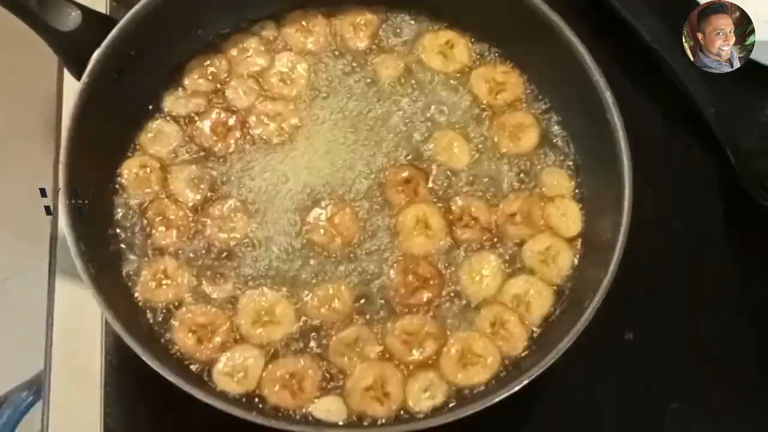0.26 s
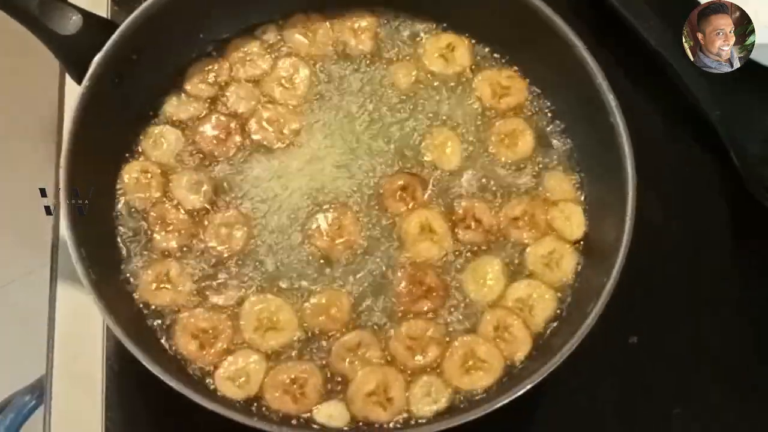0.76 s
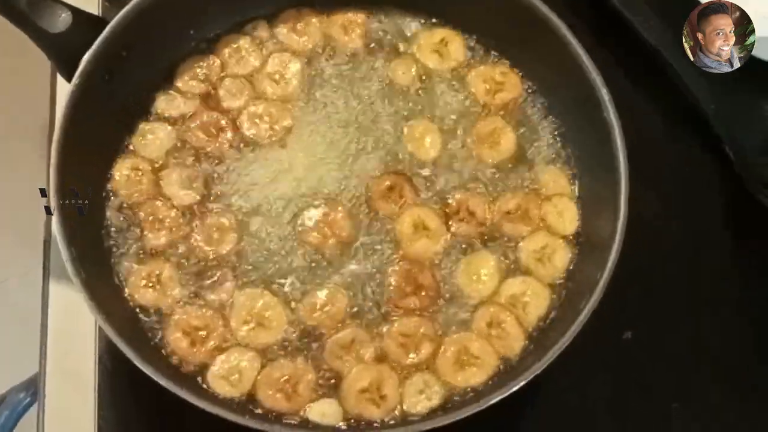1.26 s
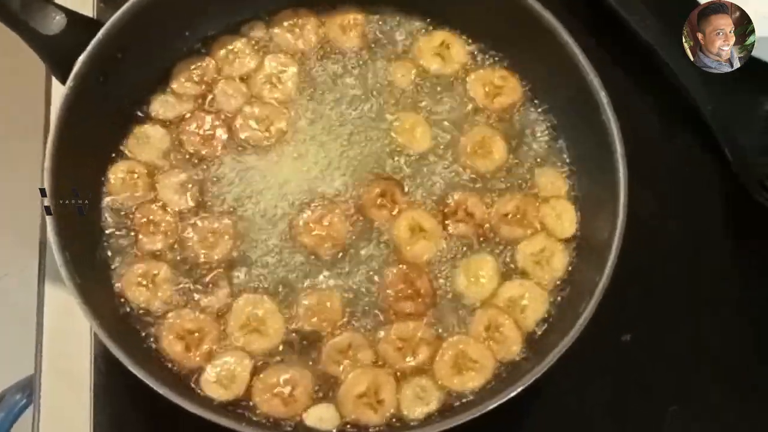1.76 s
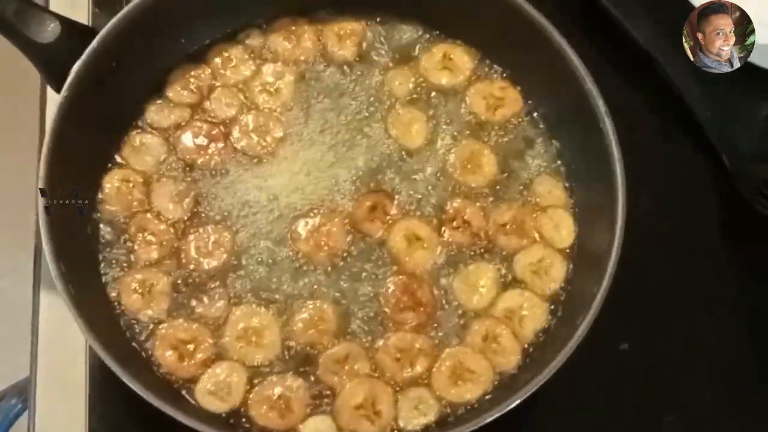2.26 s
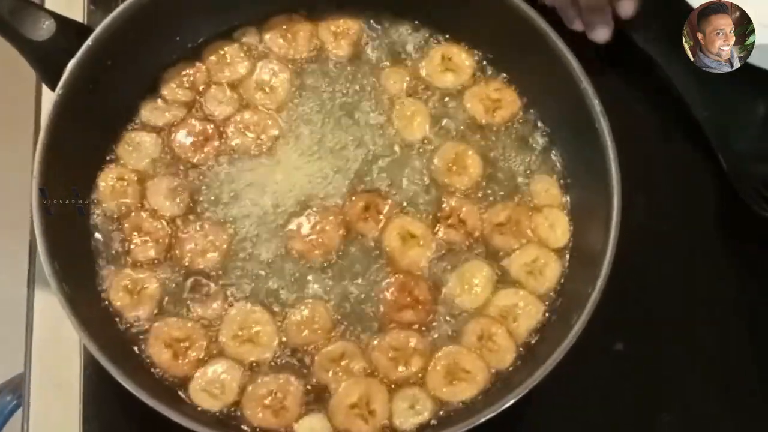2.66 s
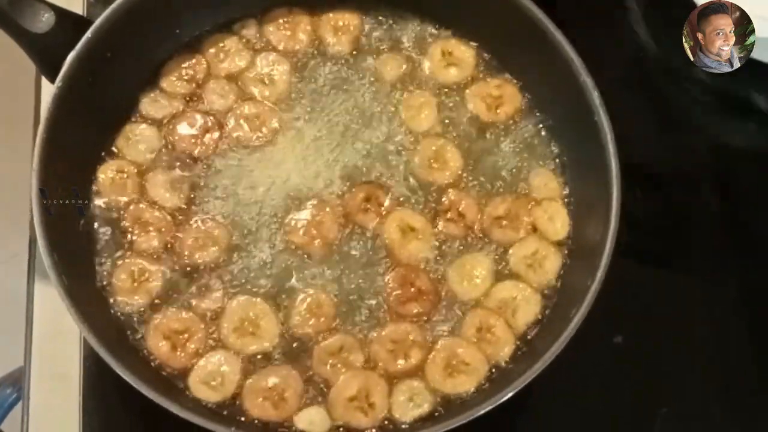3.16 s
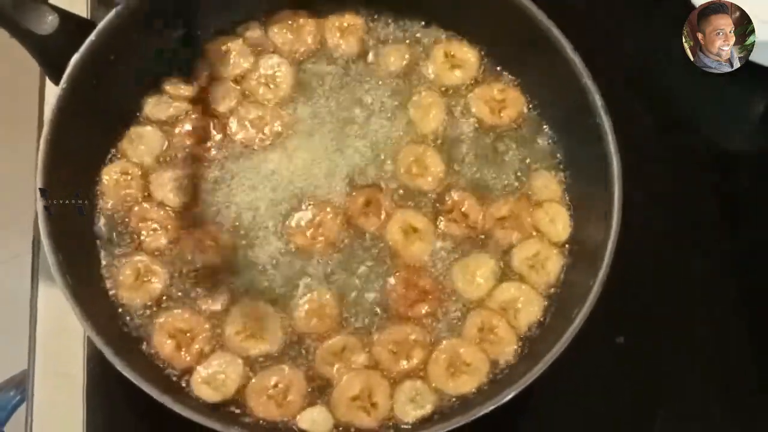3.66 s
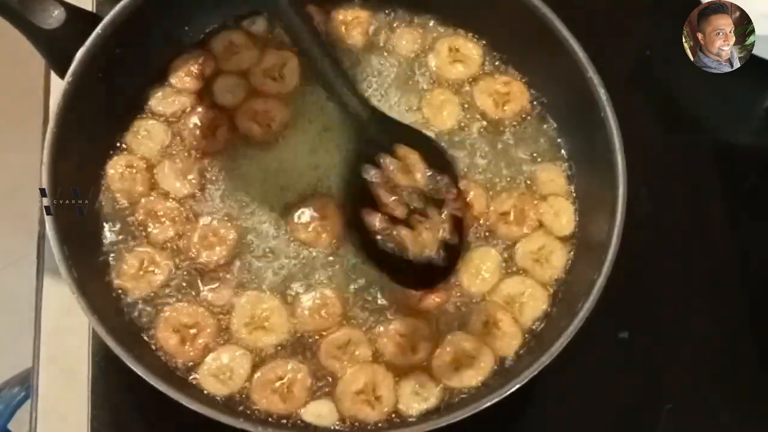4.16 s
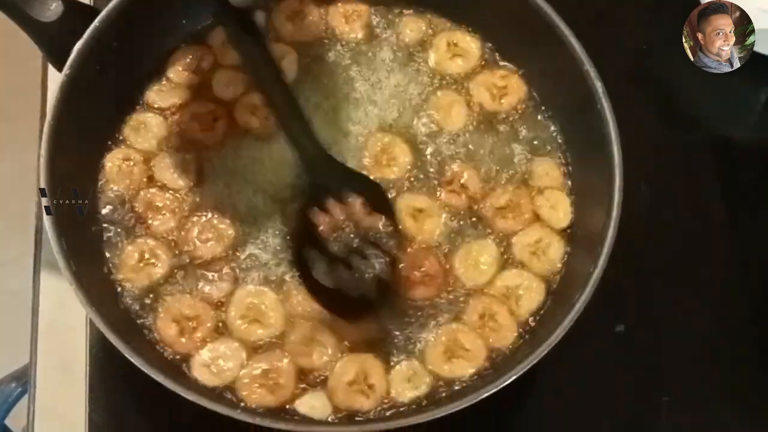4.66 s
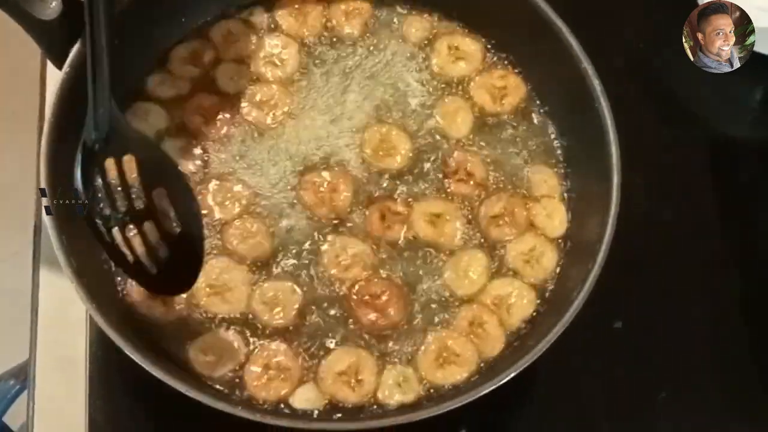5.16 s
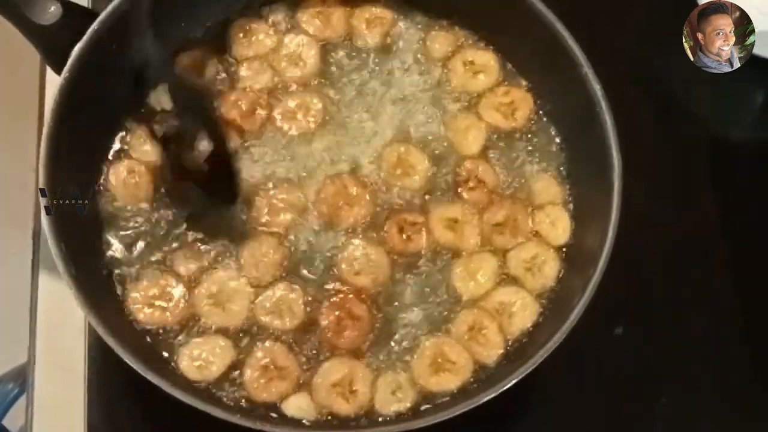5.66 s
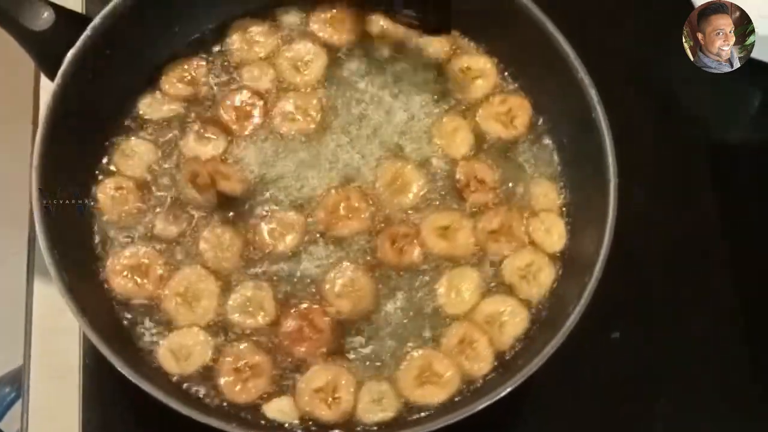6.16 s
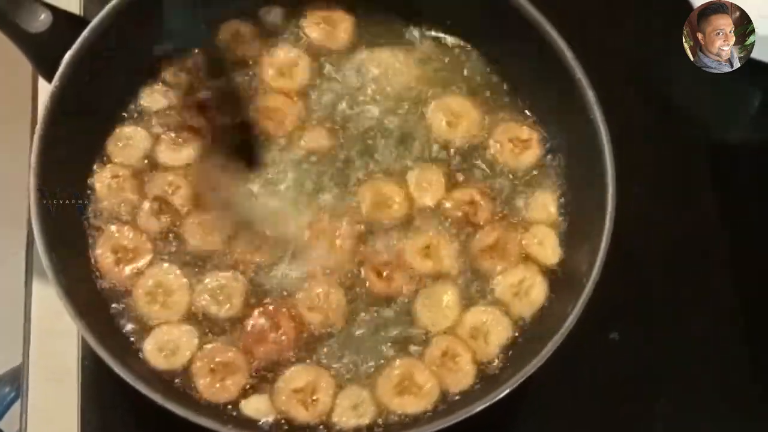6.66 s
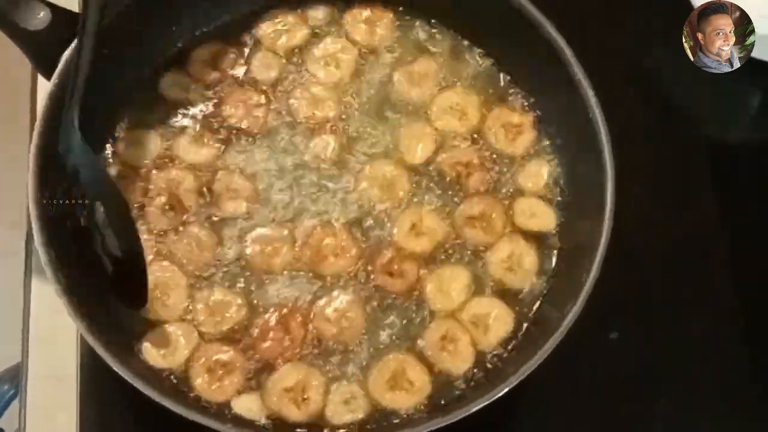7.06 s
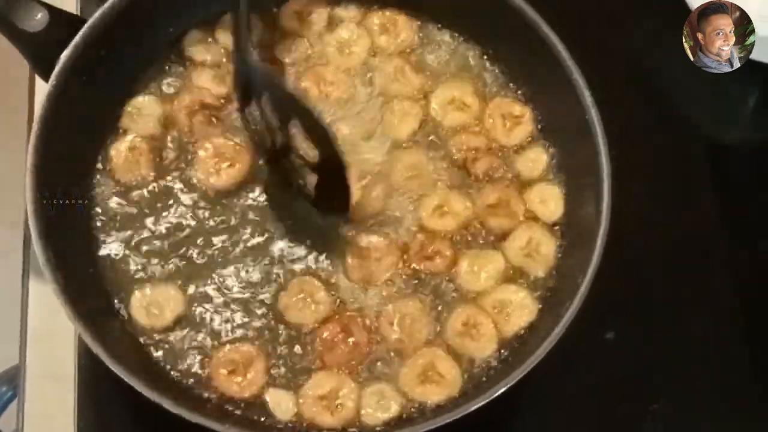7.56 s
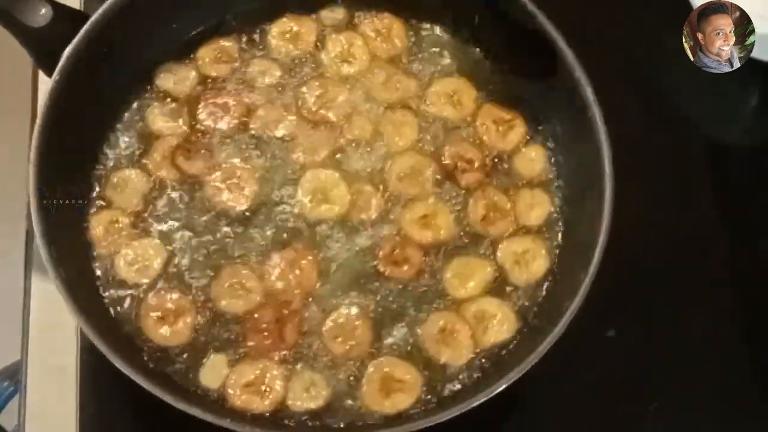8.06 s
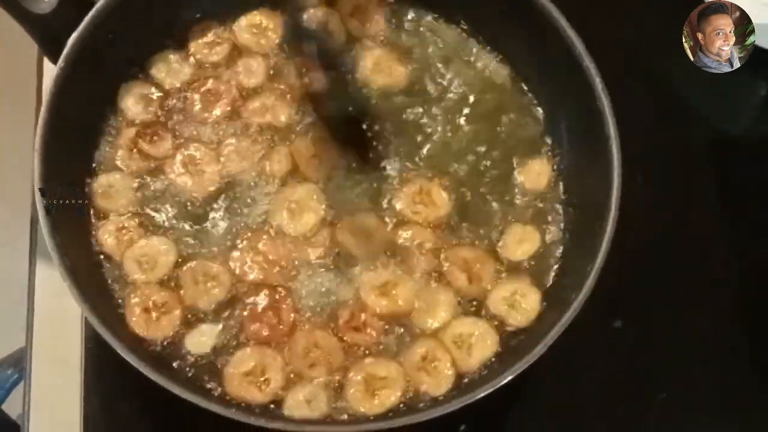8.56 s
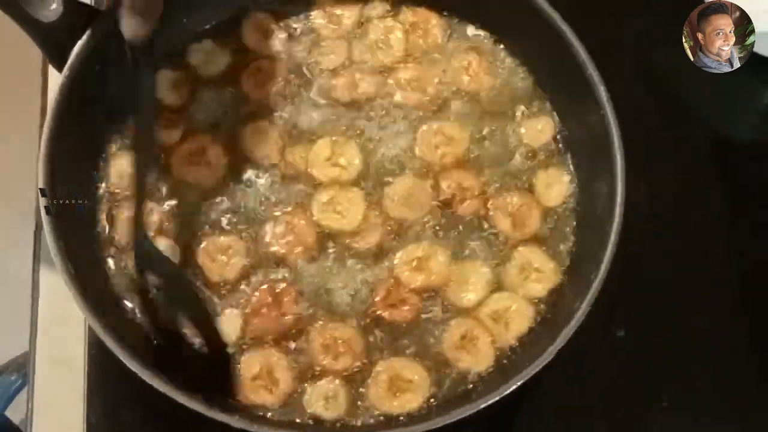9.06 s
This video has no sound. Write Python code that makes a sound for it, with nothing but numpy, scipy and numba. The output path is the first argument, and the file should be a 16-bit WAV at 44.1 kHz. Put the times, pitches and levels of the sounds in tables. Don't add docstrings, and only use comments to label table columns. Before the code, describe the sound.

Loud, close sizzle of banana slices deep-frying in hot oil, bubbling densely with sharp pops and faint spits, slowly calming over nine seconds.

```python
import sys
import numpy as np
from scipy import signal
from scipy.fft import rfft, irfft
from scipy.io import wavfile
from scipy.ndimage import uniform_filter1d
from numba import njit

SR = 44100
rng = np.random.default_rng(int(sys.argv[2]) if len(sys.argv) > 2 else 0)


def convert_level_to_amplitude(level_db):
    exponent = np.asarray(level_db, float) / 20
    return 10 ** exponent


def to_wav(s):
    ch = np.atleast_2d(s).T
    pcm = np.round(np.clip(ch, -1, 1) * 32767)
    wavfile.write(sys.argv[1], SR, pcm.astype(np.int16))


N = 411012
CUT_S, RETURN_S = 0.1488, 0.211


def level(x, db):
    return x * convert_level_to_amplitude(db) / np.sqrt(np.mean(x ** 2))


def noise():
    return rng.standard_normal(N)


def colour(x, points):
    hz, db = np.transpose(points)
    grid_hz = np.maximum(np.arange(2049) * SR / 4096, 1)
    gain = convert_level_to_amplitude(np.interp(np.log(grid_hz), np.log(hz), db))
    cepstrum = irfft(np.log(gain))
    cepstrum[1:2048] *= 2
    cepstrum[2049:] = 0
    impulse = irfft(np.exp(rfft(cepstrum)))
    return signal.fftconvolve(x, impulse)[:N]


def walk(rate_hz):
    hold = int(SR / rate_hz)
    steps = np.repeat(rng.standard_normal(N // 100), hold)[:N]
    steps = uniform_filter1d(uniform_filter1d(steps, hold), hold)
    return 1.4 * (steps - uniform_filter1d(steps, 5 * hold))


# (frequency [Hz], gain [dB])
KITCHEN_SPECTRUM = [(15, -54.5), (25, -22.5), (49, -21), (119, -5), (274, -3.5), (350, -5), (480, -3.5),
                    (580, -5.5), (730, -30)]


def kitchen():
    rumble = level(colour(noise(), KITCHEN_SPECTRUM), -53)
    return rumble * convert_level_to_amplitude(1.6 * walk(5.5) + 1.5 * walk(40))


@njit
def ring(start, hz, cycles, size, glide, length):
    out = np.zeros(length)
    for k in range(len(start)):
        span = cycles[k] * SR / hz[k]
        phase = 0.
        for i in range(min(int(4 * span), length - start[k])):
            u = i / span
            phase += 2 * np.pi * hz[k] * (1 + glide * u) / SR
            envelope = 2.7 * u * np.exp(-u) * np.exp(-.2 * u * u)
            out[start[k] + i] += size[k] * envelope * np.sin(phase)
    return out


def swarm(count, spread_db, cycles, hiss_db):
    when, pitch, big, long = rng.random((count, 4)).T
    hz = 250 + 15500 * pitch ** 1.5
    flat = np.sqrt(hz) * (pitch + .03) ** .25
    size = flat * convert_level_to_amplitude(-spread_db * np.log(big + .004))
    bubbles = ring((when * N).astype(np.int64), hz, cycles * (.5 + long), size, .04, N)
    return level(bubbles, 0) + convert_level_to_amplitude(hiss_db) * noise()


# (frequency [Hz], gain [dB])
EARLY_SPECTRUM = [(120, -70), (200, -44), (286, -30), (563, -29.5), (612, -29), (817, -19.5), (1130, -17.5),
                  (3060, -3), (4160, -24), (4600, -38), (9710, -37.5), (11500, -64.5), (15000, -98.5),
                  (22000, -120)]


def earlier_shot():
    bubbles = swarm(count=70000, spread_db=2.5, cycles=1.44, hiss_db=1.0)
    return level(colour(bubbles, EARLY_SPECTRUM), -18) + level(noise(), -56)


def echoes(x, wet_db, t60_s):
    t = np.arange(int(.25 * SR)) / SR
    tail = rng.standard_normal(len(t)) * np.exp(-np.log(1000) * t / t60_s)
    tail /= np.sqrt(np.sum(tail ** 2))
    return x + convert_level_to_amplitude(wet_db) * signal.fftconvolve(x, tail)[:N]


# (time [s], middle bubbles [dB], small bubbles against middle [dB])
BOIL = [(.5, -20.5, -11), (.8, -19.5, -12), (1.2, -20, -10.5), (1.8, -21, -11), (2.85, -20, -10),
        (3.05, -20.5, -10.5), (3.7, -21, -8), (4.1, -19.5, -8.5), (4.5, -21, -8), (5.4, -21.5, -6),
        (6.0, -21, -6.5), (6.62, -20.5, -7.5), (6.74, -24.5, -5.5), (7.35, -22, -5), (7.8, -25, -7.5),
        (8.4, -23.5, -6), (9.15, -23, -7.5), (9.32, -26.5, -5)]
SIZE_EDGES_HZ = (1550, 5150, 10300)
# (frequency [Hz], gain [dB])
COARSE_SPECTRUM = [(310, -55), (520, -26.5), (600, -31), (665, -24), (940, -22), (1160, -14), (1570, -19),
                   (1820, -10.5), (2380, -0.5), (2750, -6), (3400, -10.5), (4000, -13.5), (4650, -21.5),
                   (5200, -30)]
# (frequency [Hz], gain [dB])
FINE_SPECTRUM = [(2880, -46), (4900, -14), (5170, -19.5), (5420, -17.5), (6630, -9.5), (7150, -2.5),
                 (7470, 1), (8580, -12), (11700, -20), (13200, -20), (15400, -23)]
# (time [s], length [s], rise [dB])
SPRAY_RISES = [
    (.22, .15, 5),
    (6.9, 0.14, 3.5),
    (7.95, .2, 2.5),
    (8.65, .1, 2),
]
LARGE_DB, LARGE_SINK_DB_PER_S, LARGE_FOLLOWS_BOIL = -34, 1.0, .3
SPRAY_DB, SPRAY_FOLLOWS_FINE = -13, 1.14
SURGE_DB, SURGES_PER_S = 0.55, 6.5


def frying(t):
    source = swarm(count=60000, spread_db=2.2, cycles=2.8, hiss_db=-2.5)
    source = echoes(source, wet_db=-11, t60_s=.3)
    shifted = np.roll(source, N // 2)
    coarse = rfft(colour(source, COARSE_SPECTRUM))
    fine = rfft(colour(shifted + convert_level_to_amplitude(1) * noise(), FINE_SPECTRUM))

    octave = np.log2(np.maximum(np.arange(len(fine)) * SR / N, 1))
    above = [np.clip((octave - np.log2(edge)) / .1 + .5, 0, 1) for edge in SIZE_EDGES_HZ]
    large = coarse * (1 - above[0])
    middle = coarse * above[0] * np.sqrt(1 - above[1])
    small = fine * np.sqrt(above[1]) * (1 - above[2])
    spray = fine * above[2]

    s, *columns = np.transpose(BOIL)
    boil_db, fine_db = (np.interp(t, s, column) for column in columns)
    large_db = LARGE_DB - LARGE_SINK_DB_PER_S * t + LARGE_FOLLOWS_BOIL * (boil_db - boil_db.mean())
    small_db = boil_db + fine_db
    spray_db = small_db + SPRAY_DB + (SPRAY_FOLLOWS_FINE - 1) * (fine_db - fine_db.mean())
    for rise_s, length_s, rise_db in SPRAY_RISES:
        spray_db = spray_db + rise_db * np.exp(-((t - rise_s) / length_s) ** 2)

    surge_db = SURGE_DB * walk(SURGES_PER_S)
    ripple_db = 0.4 * walk(15) + 0.44 * walk(45)
    layers = (  # signal, level [dB], share of surge, flicker [dB]
        (large, large_db, 0.81, 1.2),
        (middle, boil_db, 1, .4),
        (small, small_db, 0.11, .6),
        (spray, spray_db, 0.31, .7))
    out = 0
    for part, db, share, flicker_db in layers:
        gain_db = db + share * surge_db + ripple_db + flicker_db * walk(18)
        out = out + level(irfft(part, N), 0) * convert_level_to_amplitude(gain_db)
    return out


def gurgle(count=1400):
    when, pitch, big = rng.random((count, 3)).T
    hz = 800 * (1450 / 800) ** np.sqrt(pitch)
    size = hz * convert_level_to_amplitude(10 * big)
    bubbles = ring((when * N).astype(np.int64), hz, np.full(count, 4.5), size, .03, N)
    return level(bubbles, -43.5)


# (frequency [Hz], width [Hz], level [dB])
PAN_MODES = [(282, 14, -59), (400, 12, -57), (425, 10, -55.5), (460, 10, -58), (650, 16, -59),
             (758, 12, -55)]


def pan(t):
    modes = 0
    for hz, width_hz, db in PAN_MODES:
        mode = signal.lfilter(*signal.iirpeak(hz, hz / width_hz, SR), noise())
        modes = modes + level(mode, db)
    return modes * convert_level_to_amplitude(2.5 - 1.2 * t + 2.0 * walk(6))


# (time [s], peak level [dB], pitch [Hz])
POPS = [(0.5557, -9, 2340), (0.866, -7, 2390), (1.111, -9, 2500), (1.151, -7.5, 2250), (1.8968, -8, 2130),
        (1.9756, -8, 2180), (2.0729, -13, 2480), (2.323, -7, 2410), (2.481, -6, 2440), (2.7983, -4, 2330),
        (3.036, -8, 2450), (3.2298, -9, 2540), (4.0689, -9, 2450), (4.3117, -4, 2360), (4.662, -8, 2520),
        (4.8516, -7.5, 2450), (5.6226, -5, 2300), (5.7013, -13, 2680), (5.7697, -7, 2520),
        (5.8453, -7, 2430), (5.9576, -5.5, 2380), (5.9902, -6.5, 2540), (6.6512, -5, 2270),
        (6.87, -3, 2560), (7.6894, -15, 2180), (7.939, -15, 2110), (8.5098, -8, 2340), (8.732, -8, 2160),
        (8.7707, -12, 2580), (8.852, -9, 2090)]


def pops(count=60):
    when_s = rng.random(count) * N / SR
    big, pitch = rng.standard_normal((count, 2)).T
    lesser = (when_s, -16 + 4 * big, 2380 + 140 * pitch)
    s, db, hz = np.hstack((np.transpose(POPS), lesser))
    return ring((s * SR).astype(np.int64), hz, np.full(len(s), 2.4), convert_level_to_amplitude(db - 1.5), 0.0098, N)


# (time [s], peak level [dB])
SPITS = [
    (0.7826, -29),
    (2.6614, -25),
    (3.3752, -28),
    (8.2861, -28),
]


def spits():
    s, db = np.transpose(SPITS)
    ticks = np.zeros(N)
    ticks[(s * SR).astype(int)] = convert_level_to_amplitude(db + 1)
    decay = np.exp(-np.arange(600) / (0.0018 * SR))
    highpass = signal.butter(4, 10000, "high", fs=SR, output="sos")
    return np.convolve(ticks, decay)[:N] * signal.sosfilt(highpass, noise())


def scene():
    t = np.arange(N) / SR
    present = frying(t) + gurgle() + pan(t) + pops() + spits()
    shots = np.where(t < RETURN_S - .02, earlier_shot(), present)
    return (kitchen() + shots)[None]


STARVED_S = (1.988, 3.915, 4.031, 4.171, 4.937, 5.657, 7.724, 8.397, 8.815, 9.21)


def rounded_lines(x, step_db, starved_db):
    half, grid, top = 1024, 625, 720
    n = np.arange(2 * half) + .5
    window = np.sin(np.pi * n / (2 * half))
    cosines = np.cos(np.pi / half * np.outer(n + half / 2, n[:top]))
    basis = window[:, None] * cosines * np.sqrt(2 / half)
    padded = np.pad(x, (2 * half - grid, 3 * half))
    blocks = padded[:len(padded) // half * half].reshape(-1, half)
    lines = np.hstack((blocks[:-1], blocks[1:])) @ basis

    step = convert_level_to_amplitude(step_db) * np.sqrt(uniform_filter1d(lines ** 2, size=9, axis=1)) + 1e-9
    lines = np.round(lines / step) * step
    starved = np.round((np.array(STARVED_S) * SR - grid) / half).astype(int) + 1
    lines[starved] *= np.abs(lines[starved]) > convert_level_to_amplitude(starved_db)

    frames = lines @ basis.T
    joined = frames[1:, :half] + frames[:-1, half:]
    return joined.ravel()[half - grid:half - grid + N]


def roll_off(x):
    return signal.sosfilt(signal.butter(12, 15710, fs=SR, output="sos"), x)


def record(dry):
    t = np.arange(N) / SR
    rounded = np.tanh(1.38 * dry[0]) / 1.466
    heard = rounded_lines(rounded, step_db=2.5, starved_db=-21)
    fade_out = np.clip((CUT_S - t) / .012 + 0.52, 0, 1) * (t < CUT_S)
    remnant = convert_level_to_amplitude(-44) * np.clip((CUT_S + .028 - t) / .028, 0, 1) * (t >= CUT_S)
    fade_in = np.clip((t - RETURN_S) / 0.29 + 0.042, 0, 1) * (t > RETURN_S)
    mix = heard * (fade_out + remnant + fade_in)
    return roll_off(mix[None])


dry = scene()
out = record(dry)
to_wav(out)
```